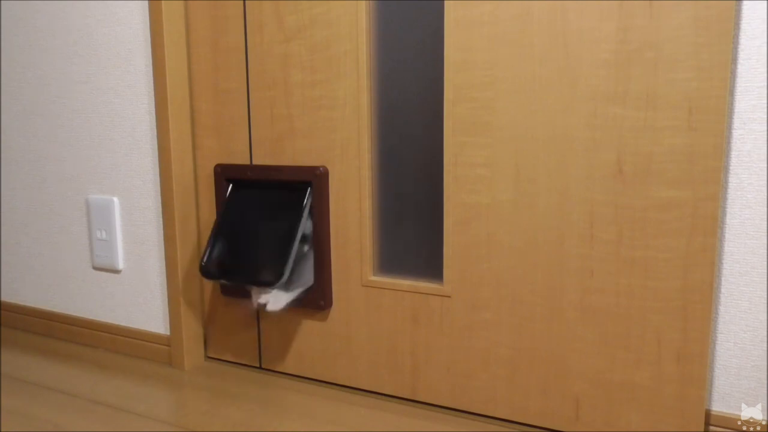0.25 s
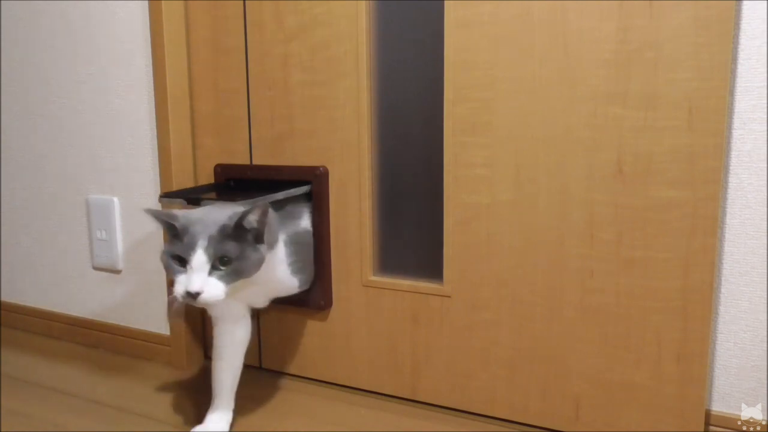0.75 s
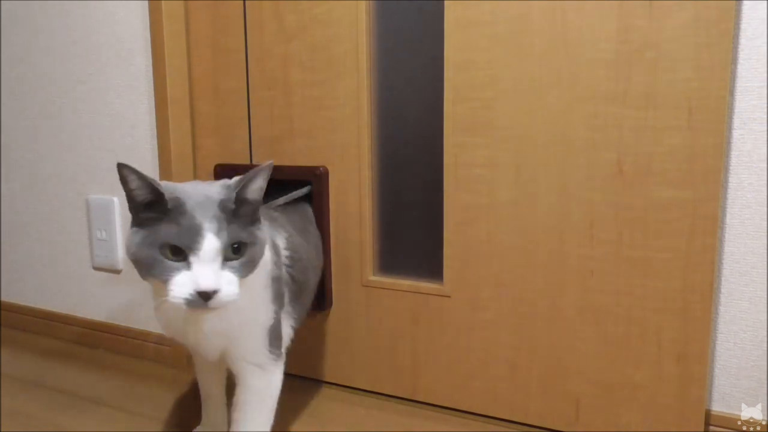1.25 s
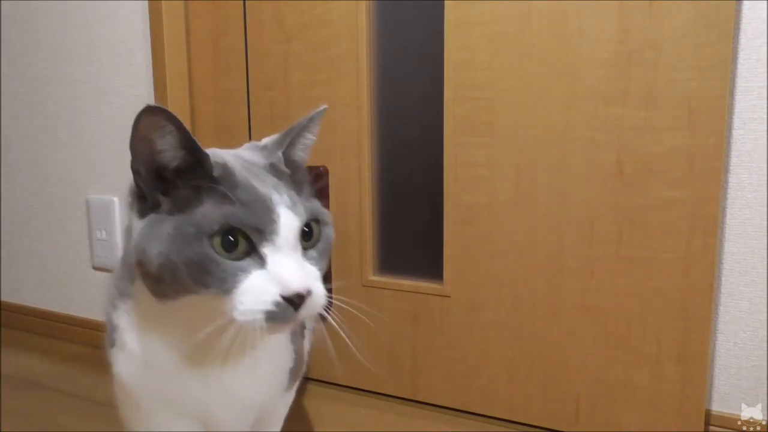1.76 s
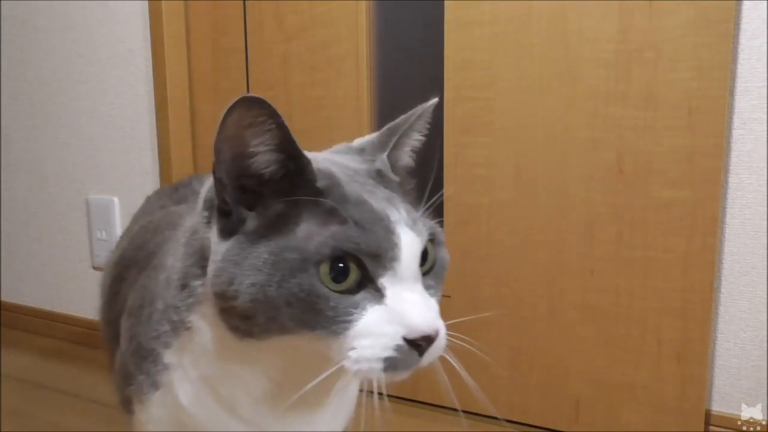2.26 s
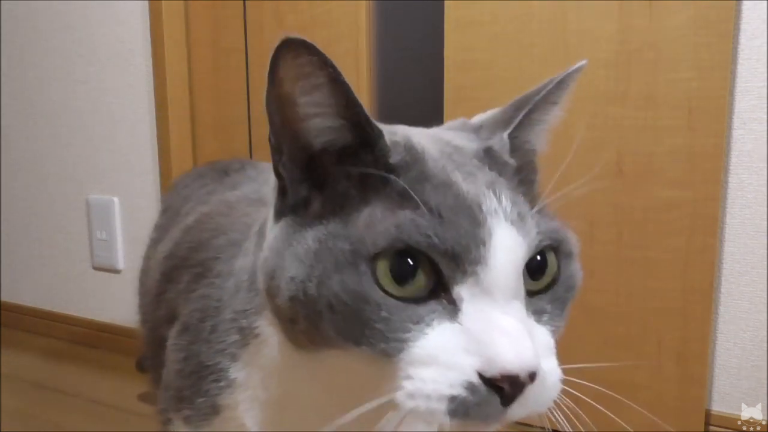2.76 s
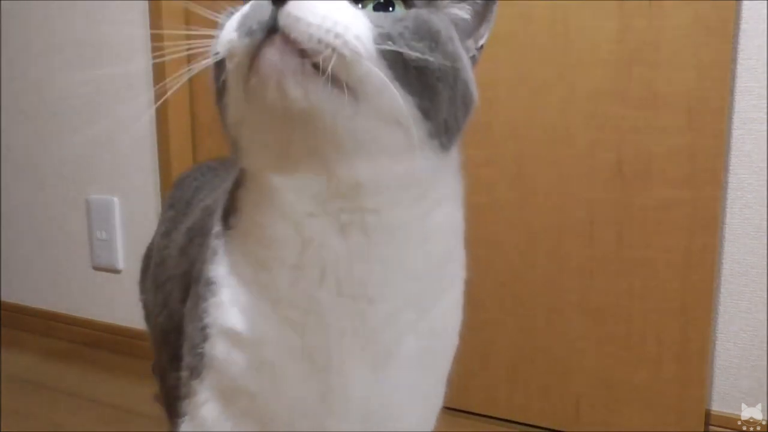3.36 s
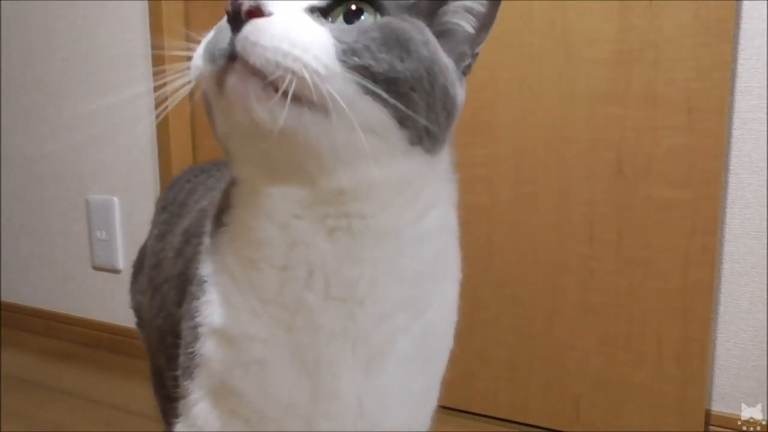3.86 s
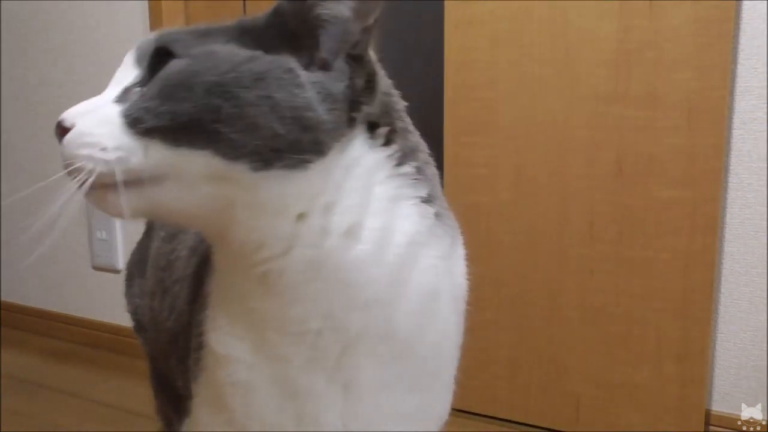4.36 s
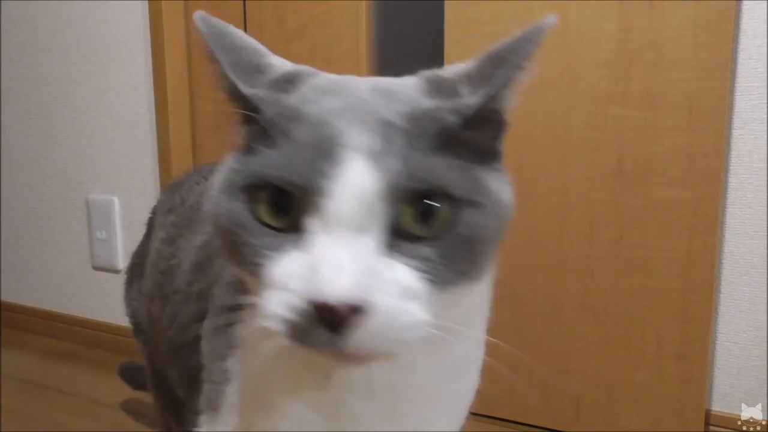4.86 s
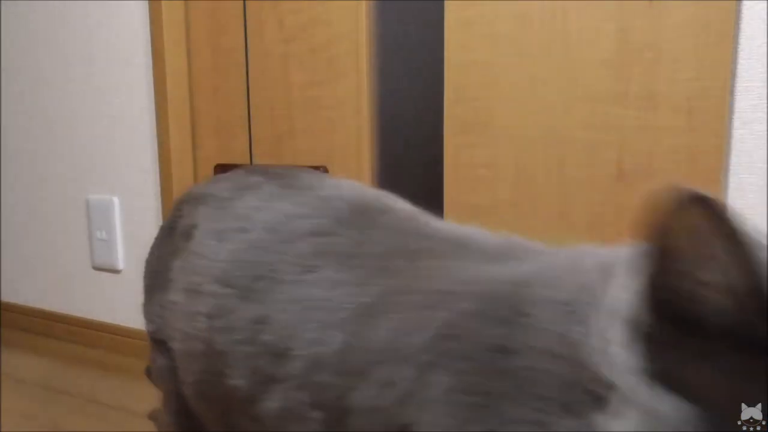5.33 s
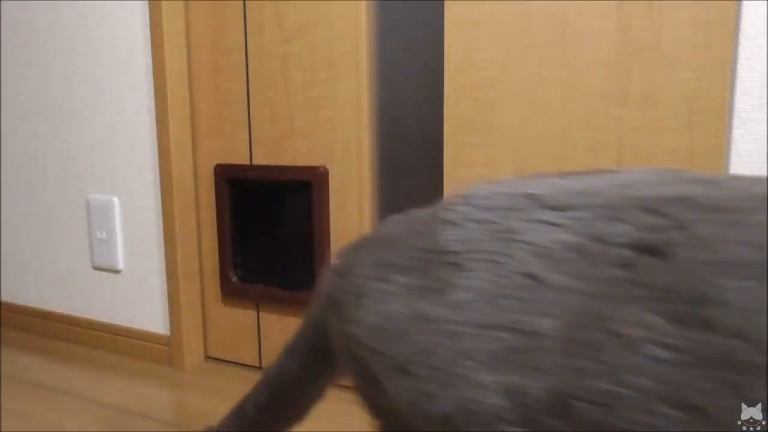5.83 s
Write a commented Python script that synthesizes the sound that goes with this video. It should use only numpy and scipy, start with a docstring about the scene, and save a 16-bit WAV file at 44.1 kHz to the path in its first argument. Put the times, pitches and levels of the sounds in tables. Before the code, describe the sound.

A quiet small hallway, with soft low ventilation rumble and faint smooth hiss throughout. At about 0.15 s a plastic cat flap knocks dully on its hollow wooden door, with a tiny squeak near 0.2 s and several light taps, fur brushing faintly. At 0.47 s it drops with a woody thump, snap and short rattle. Soft paw thuds and light knocks follow at 0.8 and 1.1 s, then a busier cluster of bumps with a brief fur rustle around 1.55-1.8 s. At 2.3-2.45 s the flap swings back and slams loudest, chattering; brighter, harder clacks at 2.7-2.9 s settle it. From 3 to 5 s only room air remains, then barely audible dry ticks from 5.1 s. At 5.62 s the cat, close by, gives a rolled, fluttering trill over faint footfalls, opening into a brighter, breathy meow that is cut off around 6.1 s.

```python
"""Light knocks of a plastic flap in a hollow wooden door come first, over quiet ventilation and hiss.
Twice the flap drops shut with a rattle; its contacts excite decaying modes, and its edge clicks as noise bursts.
Fur brushes the frame as shaped noise, paws ring the floorboards, and the hinge squeaks as a wavering tone.
At the end the cat gives a rolled trill that opens into a meow, built from harmonics and pulsed breath noise.
A small hallway adds early reflections and a short diffuse tail to every sound but the ventilation and hiss."""
import sys
import numpy as np
from scipy import signal
from scipy.fft import rfft, irfft, next_fast_len
from scipy.io import wavfile
from scipy.ndimage import uniform_filter1d

SR = 44100
rng = np.random.default_rng(int(sys.argv[2]) if len(sys.argv) > 2 else 0)


def to_wav(s):
    """Save 16-bit WAV."""
    ch = np.atleast_2d(s).T  # columns
    pcm = np.round(np.clip(ch, -1, 1) * 32767)  # PCM
    wavfile.write(sys.argv[1], SR, pcm.astype(np.int16))


N = 268569
T = np.arange(N) / SR  # s
RING = T[:SR // 2]  # time axis of one impulse response, s
LEFT_RIGHT = np.array([[1], [-1]])
CALL_S = 5.623  # start of the call
# side-to-mid ratio of the background noises: f/Hz, level/dB
BACKGROUND_SIDE = [(30, -18.5), (120, -11.5), (300, -9.5), (700, -4), (2000, -4), (5000, 0), (8000, -10.5),
                   (14000, -24.5)]


def flap(door_tilt_share=0.55):
    """Modal excitation: each contact shakes the door, rings the plastic and clicks at the edge."""
    # modes of the hollow door panel: f/Hz, relative level/dB, t60/s
    door_modes = [(155.3, -19, 0.39), (199, -8, 0.2), (236.4, 1.5, 0.18), (273.5, -0.5, 0.2),
                  (311.5, -6, 0.17), (355.6, -1, 0.12), (451.7, -15.5, 0.49)]
    # modes of the plastic flap and frame: f/Hz, relative level/dB, t60/s
    flap_modes = [(492.7, -6.5, 0.41), (558.6, 4, 0.33), (596, 3.5, 0.097), (677, 7, 0.062),
                  (707, -6.5, 0.09), (801, -10, 0.39), (842, -9.5, 0.095), (1036.4, -4.5, 0.39),
                  (1100, -1.5, 0.11), (1295, -4, 0.023), (1448, -7, 0.079), (1523, -7.5, 0.052),
                  (1593, -18.5, 0.17), (2000, -37, 0.15), (2115, -19, 0.044), (2126, -27.5, 0.11)]
    times, door_db, flap_db, tilts, edge_db = np.transpose(contacts())
    door_responses = [
        clack(door_modes, door_tilt_share * tilt, scatter_db=2.5, detune=0.012, dense_db=-4.5, dense_t60_s=0.08)
        for tilt in tilts]
    flap_responses = [
        clack(flap_modes, tilt, scatter_db=1.5, detune=0.01, dense_db=-1.5, dense_t60_s=0.02)
        for tilt in tilts]
    door = strike(times, door_db, door_responses)
    plastic = strike(times, flap_db, flap_responses)
    edge = strike(times, edge_db, [click(db) for db in edge_db])
    door = hallway(door, wet_db=-9.5, pan_db=1)
    plastic = hallway(plastic, wet_db=-3.5, pan_db=2.0)
    return door + plastic + hallway(edge, wet_db=2.5, pan_db=0.5)


def contacts():
    """Impact sequence: knocks rebound once, slams snap and chatter; rows of time, thump, clack, tilt, click."""
    # light knocks, from the cat's nudges to the last swings:
    # t/s, thump of the door panel/dB, hardness (0-1), rebound re knock/dB
    knocks = [(0.159, -37.5, 0.09, -15), (.169, -53, .45, -3), (.257, -46, .38, -3), (.294, -38.5, .2, -8),
              (.331, -39, .24, -5), (.792, -49.5, .38, -20), (1.119, -48.5, 0.24, -3),
              (1.540, -52, 0.23, -17), (1.665, -47.5, 0.31, -17), (1.679, -35.5, 0.1, -2),
              (1.718, -42.5, 0, -8), (1.762, -49.5, .1, -6), (1.799, -63.5, .9, -5), (2.329, -43, 0, -1),
              (2.428, -34, 0.33, -8), (2.7344, -46.5, 0.85, 3.5), (2.7709, -38, 0.65, -4),
              (2.830, -44, 0.68, -16), (2.840, -49, 0.45, -13), (2.881, -51, 0.89, -14)]
    # the flap falls against its frame: t/s, thump/dB, snap re thump/dB, time scale of the chatter's loss/s
    slams = [(.4744, -28, -7, 0.04), (2.379, -26, -10, .05)]
    # kinds of contact: clack re thump/dB, tilt of the clack/(dB per octave), click re thump/dB
    soft = np.array((-17.5, -2, -33.5))  # cushioned by the cat
    hard = np.array((2.7, 21.2, -1.3))  # bare edge on the catch
    rebound, rebound_s = (-11.5, -7, -23), .021  # the flap drops back once after a knock
    slam = (-16, 0, -35.5)  # the door takes the weight first
    snap, snap_s = (0, 4.5, -7.5), .0073  # then the edge snaps home
    chatter, chatter_gap_s, chatter_db = (-4, -1.9, -21), .0118, -3
    gap_scatter, chatter_fall_db = .25, 5  # relative unevenness of the gaps; loss after one time scale

    def touch(s, db, kind):
        clack_db, tilt, click_db = kind
        return s, db, db + clack_db, tilt, db + click_db

    rows = []
    for s, db, hardness, rebound_db in knocks:
        rows.append(touch(s, db, soft + hardness * (hard - soft)))
        rows.append(touch(s + rebound_s, db + rebound_db, rebound))
    for s, db, snap_db, length_s in slams:
        rows.append(touch(s, db, slam))
        rows.append(touch(s + snap_s, db + snap_db, snap))
        gaps = chatter_gap_s * (1 + gap_scatter * rng.standard_normal(size=5))
        for age in snap_s + np.cumsum(gaps):
            loss_db = chatter_fall_db * (age / length_s) ** 2
            rows.append(touch(s + age, db + chatter_db - loss_db, chatter))
    return rows


def clack(modes, tilt, scatter_db, detune, dense_db, dense_t60_s):
    """Modal response weighted anew for each point of contact, over a short burst of countless weak modes."""
    tilted = [(hz, db + tilt * np.log2(hz / modes[0][0]), t60) for hz, db, t60 in modes]
    chance = rng.standard_normal((len(modes), 2))
    varied = [(hz * (1 + detune * a), db + scatter_db * b, t60)
              for (hz, db, t60), (a, b) in zip(tilted, chance)]
    main = ring(varied)
    (low_hz, low_db, _), (high_hz, high_db, _) = tilted[0], tilted[-1]
    # the weak modes follow the outline of the main ones and fall off beyond them
    outline = [(low_hz / 2, low_db - 21), *[mode[:2] for mode in tilted], (high_hz * 2, high_db - 32)]
    onset = np.minimum(RING / 0.0015, 1)
    dense = blow(noise(outline, len(RING)) * fade(dense_t60_s) * onset)
    return blow(main + undb(dense_db) * dense)


def click(db, crack_db=3, crack_t60_s=0.0071, buzz_t60_s=0.082, brightening=0.17, plain_db=-52):
    """Hard impact: a sharp crack and a brief buzz of the edge; the harder the blow, the brighter."""
    # spectrum of the edge before brightening: f/Hz, relative level/(dB per Hz)
    edge_spectrum = [(300, 9), (900, 20.5), (1500, 8.5), (2100, 11), (2700, -2), (3600, 5.5), (4700, 5),
                     (6500, -4), (9500, 0.5), (12000, -10), (15500, -39)]
    tilt = brightening * np.clip(db - plain_db, -8, 8)  # dB per octave
    spectrum = [(hz, level + tilt * np.log2(hz)) for hz, level in edge_spectrum]
    decay = undb(crack_db) * fade(crack_t60_s) + fade(buzz_t60_s)
    return blow(noise(spectrum, len(RING)) * decay)


def hinge(s=0.19, length_s=0.024, hz=1085, db=-52):
    """Friction squeak as the flap first lifts: a frequency-modulated tone under a bell-shaped envelope."""
    phase = 2 * np.pi * np.cumsum(hz * (1 + 0.036 * walk(194))) / SR
    swell = np.exp(-((T - s) / length_s) ** 2)
    return hallway(np.sin(phase) * undb(db) * swell, wet_db=-2)


def meow(jitter=0.0252, bend=0.021, rasp_db=-25, rasp_half_db=5, rasp_open_db=-1,
         whistle_db=-22, whistle_hz=3970, trill_hz=38):
    """Source and filter: a fluttering voice whose third and fourth harmonics rise as the mouth opens."""
    # harmonics from the first up: level/dB with mouth shut, half open, wide open,
    # left minus right/dB, phase lead of the left/rad
    harmonics = [(0.5, -6, -5, -0.5, 0.77), (-3.5, -1, -6.5, -4.5, 0.65), (-22, -2.5, 10.5, -4, -1.4),
                 (-21, -32, 10, -3, -1.95), (-35, -26.5, -10.5, -9, -0.15), (-43, -41, -17.5, -12, 1.8),
                 (-63, -36, -24, -1, 1.2), (-54, -36.5, -27, -12, 1), (-58, -59, -11.5, -9, -0.96)]
    # air rushing through throat and mouth: f/Hz, relative level/(dB per Hz)
    rasp_spectrum = [(150, -26), (500, 3), (1300, 4), (1900, -22), (2300, -22), (2800, -23), (3400, -23),
                     (4500, -16), (6200, -26), (8500, -17.5), (15000, -44)]
    openings = [0, .5, 1]
    hz, effort, mouth, depth = call_controls()
    flutter = np.cos(2 * np.pi * trill_hz * (T - CALL_S)) * depth
    # a deeper trill unsteadies the pitch and each beat bends it, so upper harmonics smear more
    wander = jitter * (depth + 0.2) * walk(150)
    phase = 2 * np.pi * np.cumsum(hz * (1 + wander + bend * flutter)) / SR
    voice = 0
    for k, (*mouth_db, pan_db, lead) in enumerate(harmonics, 1):
        beat = 1 + flutter * (.4 if k == 1 else .9)
        shimmer_db = 0.29 * k * walk(45)
        gain = undb(np.interp(mouth, openings, mouth_db) + shimmer_db + LEFT_RIGHT * pan_db / 2)
        tone = np.sqrt(2) * np.sin(k * phase + LEFT_RIGHT * lead / 2)
        voice = voice + tone * beat * gain
    # turbulence puffs once a cycle and is strongest with the mouth half open
    rasp_gain = undb(rasp_db + np.interp(mouth, openings, [0, rasp_half_db, rasp_open_db]))
    rasp = noise(rasp_spectrum, N) * rasp_gain * (1 + np.cos(phase)) * (1 + flutter / 2)
    # the narrow gap between the lips adds one thin resonance that rises as they part
    gap = mouth - .46  # loudest at this opening
    glide = np.cos(2 * np.pi * np.cumsum(whistle_hz * (1 + 0.23 * gap)) / SR)
    whistle = walk(350) * glide * undb(whistle_db - 100 * abs(gap))
    breath = hallway((rasp + whistle) * effort, wet_db=6.0, pan_db=-1.5)
    return hallway(voice * effort, wet_db=-11) + breath


def call_controls():
    """Articulation: pitch, effort, mouth opening and trill depth; effort and an open mouth both damp the trill."""
    # pitch, a dip and a slow rise: t/s, f/Hz
    pitch = [(5.625, 340), (5.70, 300), (5.77, 345), (5.89, 357), (5.93, 378), (6.02, 368), (6.09, 375)]
    # effort of the call: t/s, level/dB
    effort_points = [(5.623, -56.5), (5.652, -38.5), (5.70, -35), (5.74, -36.5), (5.83, -35.5),
                     (5.885, -30.5), (5.945, -37), (6.035, -33.5), (6.09, -35.5)]
    # the lips part slowly, wait, then the jaw drops: t/s, mouth opening (0-1)
    mouth_points = [(5.72, 0.01), (5.84, 0.17), (5.925, .45), (5.98, .47), (6.08, 0.99)]
    trill_depth, trill_db, ease_per_db = 0.81, -35, .085  # depth at this effort; loss of depth per dB above it
    trill_ends = (0.47, 0.89)  # the trill dies away between these mouth openings
    db = np.interp(T, *np.transpose(effort_points))
    mouth = np.interp(T, *np.transpose(mouth_points))
    depth = np.clip(trill_depth - ease_per_db * (db - trill_db), 0, 1)
    depth = depth * np.interp(mouth, trill_ends, [1, 0])
    hz = np.interp(T, *np.transpose(pitch))
    return hz, undb(db) * (T > CALL_S), mouth, depth


def paws():
    """Modal excitation: soft landings ring the wooden floorboards."""
    # landings: t/s, level/dB
    landings = [(.797, -38), (1.122, -45.5), (1.680, -35), (5.659, -40.5), (5.878, -44.5)]
    # modes of the floorboards: f/Hz, relative level/dB, t60/s
    board_modes = [(94.5, 2.5, 0.085), (121, 0.5, 0.11), (153.7, -11, 0.19), (239, 1.5, 0.063),
                   (282, 0, 0.24)]
    steps = strike(*np.transpose(landings), [ring(board_modes) for _ in landings])
    return hallway(steps, wet_db=-10.0)


def fur():
    """Friction noise: each part of the body swells and fades as it passes the frame; the parts add in power."""
    # strokes from head to tail: t/s, level/dB, rise/s, fall/s (time constants)
    strokes = [(.28, -63.5, 0.087, 0.028), (.86, -65, 0.22, 0.21), (1.35, -64, 0.32, .45),
               (1.635, -55.5, 0.0092, 0.11)]
    # spectrum of the rubbing: f/Hz, relative level/(dB per Hz)
    spectrum = [(500, 10.5), (1500, -1), (4000, -2.5), (6500, -6), (9500, 1.5), (13000, -10), (16000, -34)]
    power = 0
    for s, db, rise, fall in strokes:
        swell = np.exp(-np.maximum((s - T) / rise, (T - s) / fall))
        power = power + (undb(db) * swell) ** 2
    uneven = undb(3.3 * walk(43))
    return hallway(noise(spectrum, N) * np.sqrt(power) * uneven, wet_db=-8.5)


def ticks():
    """Damped impulses: tiny dry ticks, each a few milliseconds of bright noise."""
    # ticks: t/s, level/dB
    tick_points = [(.794, -66.5), (2.286, -73), (5.123, -70), (5.404, -70), (5.520, -70), (5.554, -60.5)]
    spectrum = [(1000, -25), (3500, -14), (7500, 6), (15000, -8)]  # f/Hz, relative level/(dB per Hz)
    responses = [blow(noise(spectrum, len(RING)) * fade(0.0054)) for _ in tick_points]
    return hallway(strike(*np.transpose(tick_points), responses), wet_db=-10.0)


def ventilation(air_db=-53.5):
    """Broadband flow noise with narrow-band hums, each a carrier under random quadrature modulation."""
    # spectrum of the rumble: f/Hz, relative level/(dB per Hz)
    air_spectrum = [(18, -45), (30, -17), (101, -7), (136, -9.5), (201, -3), (234, -9.5), (272, 0),
                    (315, -12.5), (366, -8.5), (503, -14), (717, -14.5), (1790, -30), (2600, -37.5),
                    (3380, -67), (5720, -120)]
    # narrow hums: f/Hz, rate of wander/Hz, level/dB
    hums = [(53, 9.5, -69), (87.4, 7.9, -66.5), (109.7, 5.9, -65), (271.2, 16, -65.5), (361.4, 10, -67.5)]
    rumble = stereo_noise(air_spectrum, BACKGROUND_SIDE, N) * undb(air_db + .5 * walk(9.3))
    hum = 0
    for hz, width, db in hums:
        angle = 2 * np.pi * hz * T
        hum = hum + undb(db) * unit(walk(width) * np.cos(angle) + walk(width) * np.sin(angle))
    return rumble + hum


def hiss(level_db=-68.17):
    """Stationary random noise: the smooth hiss of the microphone."""
    # spectrum: f/Hz, relative level/(dB per Hz)
    spectrum = [(1410, -24), (2400, -3), (2760, -3.5), (3130, -4.5), (3890, -3.5), (5070, -6.5),
                (6120, -14.5), (6980, -4.5), (9910, 0.5), (14200, -3), (15500, -6.5)]
    return stereo_noise(spectrum, BACKGROUND_SIDE, N) * undb(level_db)


def hallway(x, wet_db, pan_db=0):
    """Reverberation by convolution: direct sound, early reflections from near walls and a diffuse tail."""
    # side-to-mid ratio of the echo: f/Hz, level/dB
    room_side = [(100, -17), (300, -12), (600, -9), (1000, -2), (2000, -3), (5000, -1), (15000, -2)]
    room_t60_s, early_t60_s, early_db = 0.44, 0.11, 7
    spectrum = [(100, 4.9), (4000, 1.0), (15000, -2.0)]  # f/Hz, relative level/(dB per Hz)
    tail = stereo_noise(spectrum, room_side, len(RING))
    tail = tail * (fade(room_t60_s) + undb(early_db) * fade(early_t60_s))
    tail = tail * np.clip((RING - .002) / 0.0082, 0, 1)  # 2 ms of silence, then a ramp
    tail = tail / np.sqrt(np.sum(tail ** 2) / 2)  # unit mean energy per channel
    echo = signal.fftconvolve(np.atleast_2d(x), tail, axes=1)[:, :N]
    return (x + undb(wet_db) * echo) * undb(LEFT_RIGHT * pan_db / 2)


def strike(times, dbs, responses):
    """Superposition: play each impulse response at its time and level."""
    out = np.zeros(N + len(RING))
    for s, db, response in zip(times, dbs, responses):
        start = int(s * SR)
        out[start:start + len(RING)] += undb(db) * response
    return out[:N]


def ring(modes):
    """Modal sum of a struck body; neighbouring modes swing in opposite directions."""
    total = 0
    for k, (hz, db, t60) in enumerate(modes):
        total = total + (-1) ** k * undb(db) * fade(t60) * np.sin(2 * np.pi * hz * RING)
    return blow(total)


def fade(t60):
    """Exponential decay by 60 dB in t60 seconds."""
    return np.exp(-np.log(1000) * RING / t60)


def blow(response):
    """Level reference: scale a response to rms 1 over its first 20 ms."""
    return response / np.sqrt(np.mean(response[:SR // 50] ** 2))


def stereo_noise(points, side, size):
    """Mid-side stereo: a common noise of rms 1, plus a second one that enters the channels in antiphase."""
    length = next_fast_len(size)
    mid = noise(points, length)
    return (mid + LEFT_RIGHT * colour(noise(points, length), side))[:, :size]


def noise(points, size):
    """Spectral shaping of white noise, rms 1."""
    return unit(colour(rng.standard_normal(next_fast_len(size)), points)[:size])


def colour(x, points):
    """Zero-phase filtering by (f/Hz, level/dB) points, joined on a logarithmic frequency axis."""
    hz, db = np.transpose(points)
    f = np.maximum(np.fft.rfftfreq(len(x), 1 / SR), 1)
    return irfft(rfft(x) * undb(np.interp(np.log(f), np.log(hz), db)), len(x))


def walk(rate):
    """Band-limited random wander: random steps at the given rate in Hz, smoothed, with a spread near 1."""
    k = int(SR / rate)
    return uniform_filter1d(np.repeat(rng.standard_normal(N // k + 1), k), k)[:N]


def unit(x):
    """Level reference: scale to rms 1."""
    return x / np.sqrt(np.mean(x ** 2))


def undb(db):
    """Amplitude ratio of a level in decibels."""
    return 10 ** (np.asarray(db) / 20)


def scene():
    """Superposition of the flap, the cat and the background."""
    cat = meow() + paws() + fur() + ticks()
    return flap() + hinge() + cat + ventilation() + hiss()


def record(dry, low_cut_hz=42, top_hz=15550):
    """Band limiting: a high-pass thins the deep bass and a steep low-pass cuts the top."""
    thin = signal.sosfilt(signal.butter(3, low_cut_hz, "high", fs=SR, output="sos"), dry)
    return signal.sosfilt(signal.ellip(10, .2, 70, top_hz, fs=SR, output="sos"), thin)


dry = scene()
out = record(dry)
to_wav(out)
```